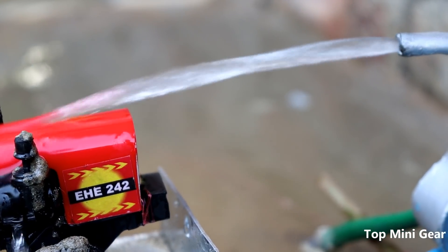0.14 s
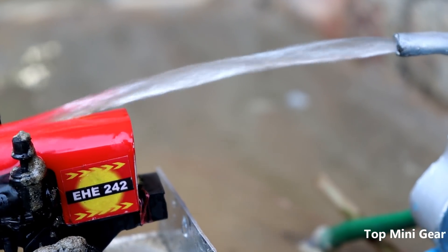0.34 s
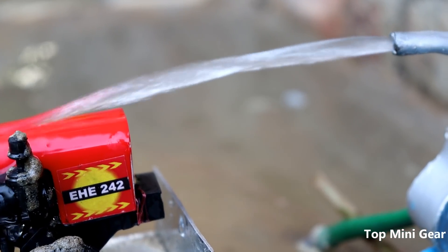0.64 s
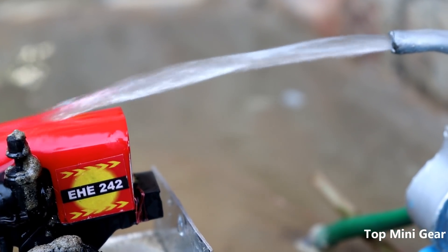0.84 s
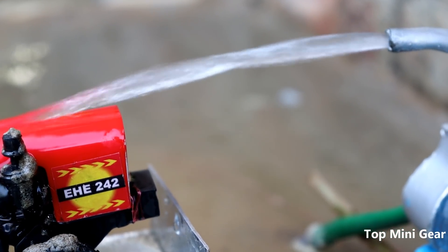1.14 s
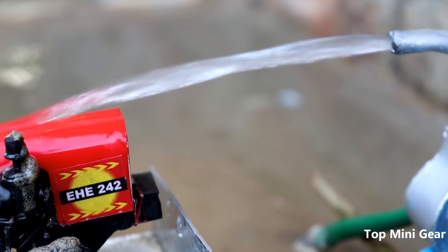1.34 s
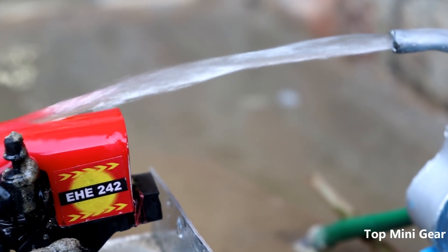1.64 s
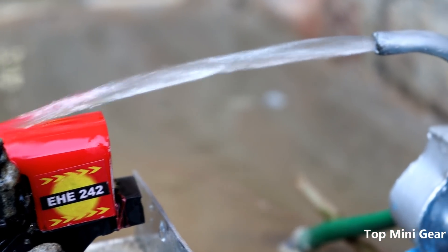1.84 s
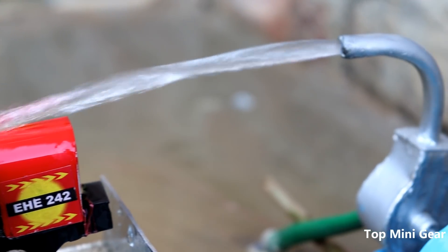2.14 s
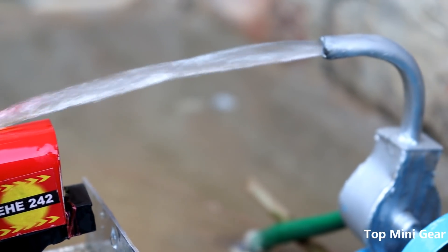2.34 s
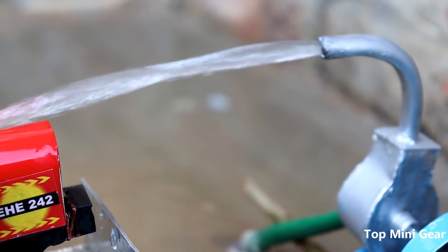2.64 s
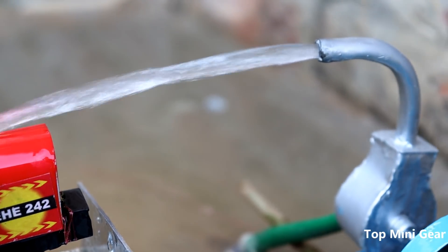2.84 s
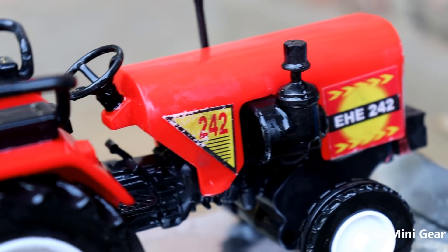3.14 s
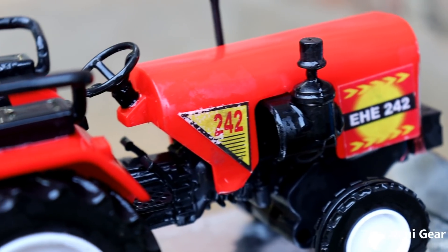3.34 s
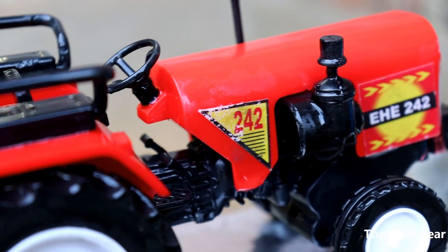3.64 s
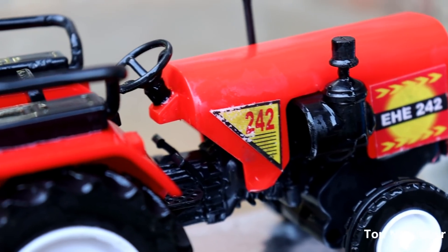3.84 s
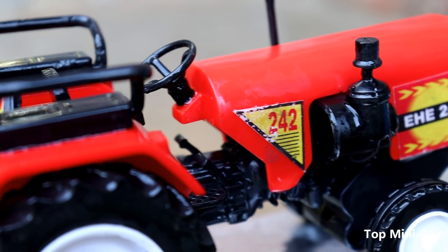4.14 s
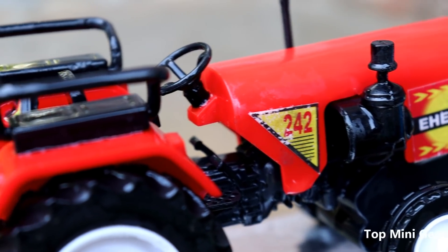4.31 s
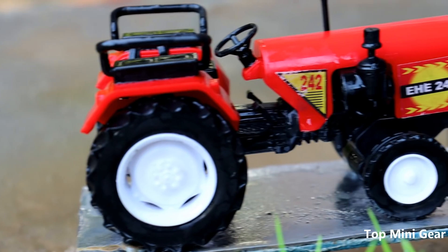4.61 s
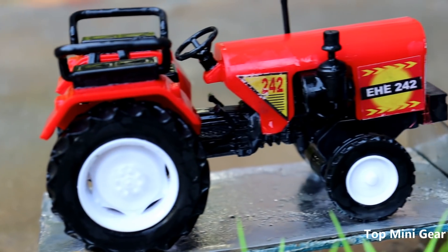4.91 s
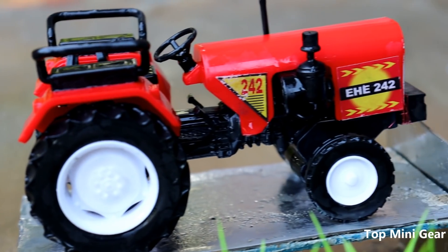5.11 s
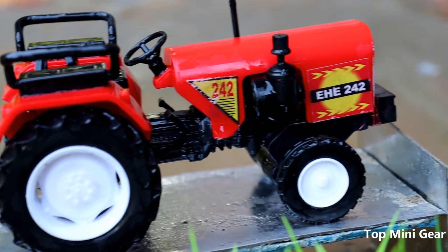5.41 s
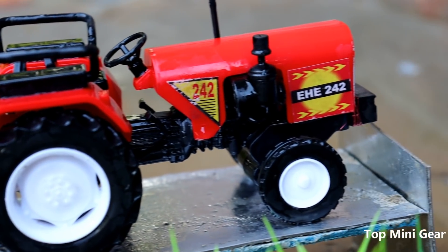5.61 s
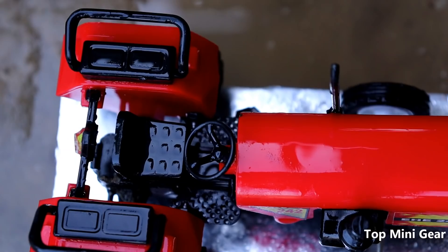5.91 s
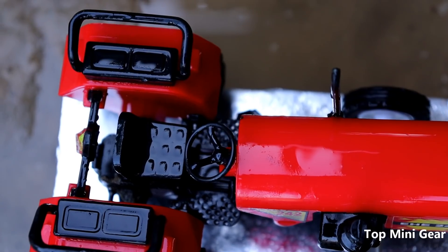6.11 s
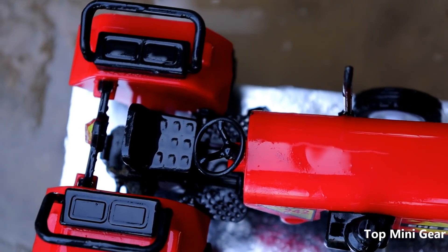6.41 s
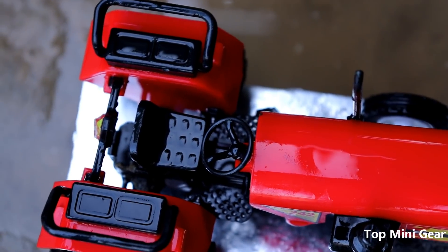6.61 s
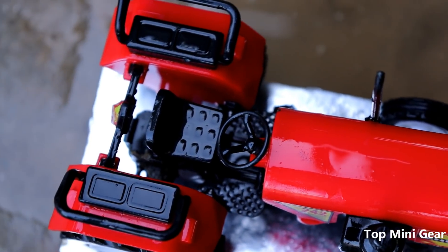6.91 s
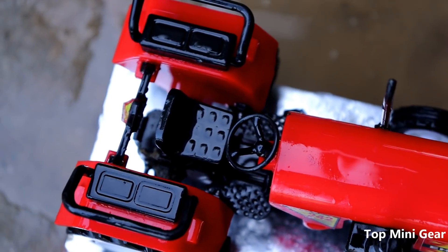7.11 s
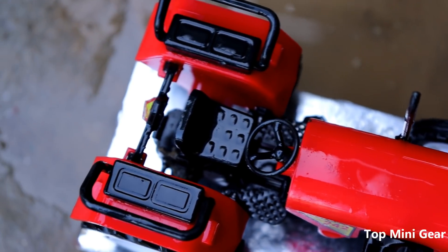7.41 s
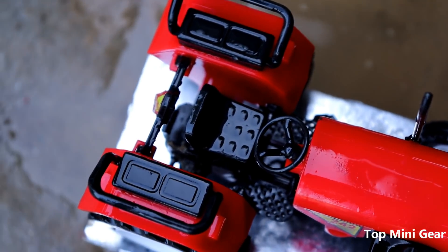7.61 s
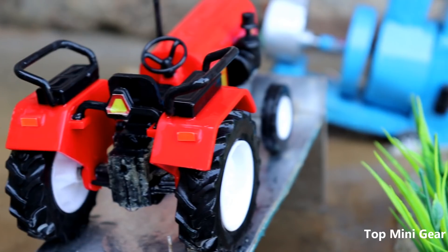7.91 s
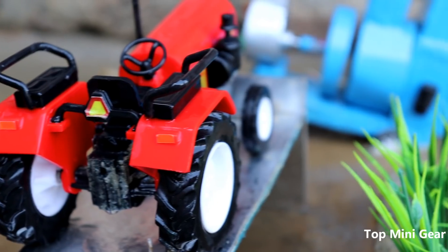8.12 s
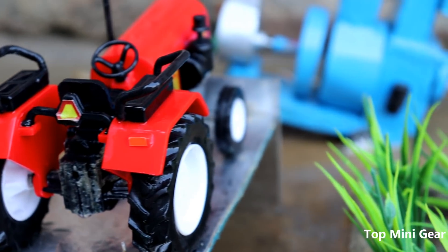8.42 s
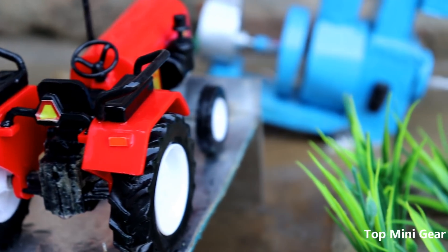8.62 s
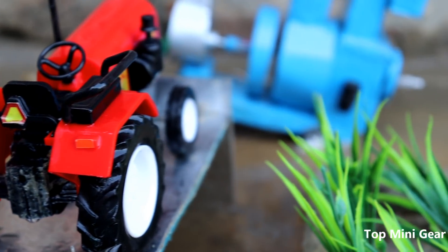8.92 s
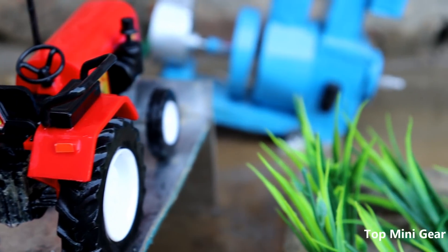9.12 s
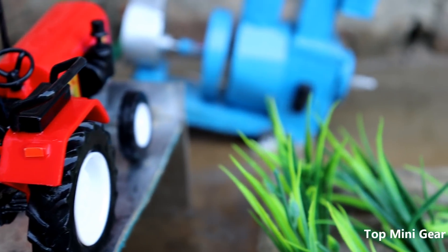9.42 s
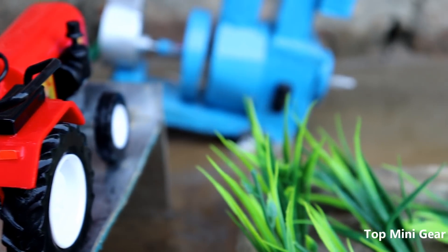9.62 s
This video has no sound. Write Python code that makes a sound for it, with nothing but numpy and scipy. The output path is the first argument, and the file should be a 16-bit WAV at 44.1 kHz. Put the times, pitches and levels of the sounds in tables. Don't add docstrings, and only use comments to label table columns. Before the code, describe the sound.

From 0 to 3 seconds a small single-cylinder pump engine runs very close, about twelve cycles a second. Each cycle has a hollow ringing puff around 350 Hz, weaker suction pulses, irregular metallic clatter and a bright exhaust hiss that grows stronger and sharper. Water spray fills in steadily beneath, with slight low wind buffeting. At 3.0 a small clank and a hard cut drop everything to a far quieter yard with soft rumble and distant bird haze. Quick chirps and falling whistles begin at once; hoarse crow caws come around 3.7-4.6 and 4.7-5.4. At about 5.0 one tiny engine thud and click flashes for under 0.04 seconds. From 5.4 to 7.7 come low whistles, buzzy trills and a thin arched note near 6.9. Fainter rattling caws follow at 7.8 and 8.4, then a longer, clearer caw from 8.8 with chirps until 9.75.

```python
import sys
import numpy as np
from scipy import signal
from scipy.fft import rfft, irfft, next_fast_len
from scipy.io import wavfile
from scipy.ndimage import uniform_filter1d

SR = 44100
rng = np.random.default_rng(int(sys.argv[2]) if len(sys.argv) > 2 else 0)


def rack_gain(trim_db):
    fader = np.asarray(trim_db, float)
    return 10 ** (fader / 20)


def output_pcm(signal):
    pcm = np.clip(np.atleast_2d(signal).T, -1, 1) * 32767
    wavfile.write(sys.argv[1], SR, np.round(pcm).astype(np.int16))


N = 429975

# t/s, cycles turned; the flash catches mid-cycle
CRANK = [(-.0651, 0), (.5318, 7), (1.042, 13), (1.4665, 18), (2.0624, 25), (2.3174, 28), (2.6585, 32),
         (3.0842, 37), (4.891, 58), (5.146, 61), (9.75, 115)]
# t/ms, f/Hz, half length/ms, peak/dB, push 1 or suction -1
PUFFS = [
    (.1, 358, 2.3, -3.5, 1),
    (-4.7, 340, 2, -18, 1),
    (23.2, 310, 2.6, -8.3, -1),
    (30.2, 330, 2.8, -16, 1),
    (43.2, 395, 5.5, -20.5, 1),
    (60.05, 370, 1.9, -10, -1),
    (42, 760, 1.6, -19, 1),
    (58.6, 760, 1.5, -20, 1),
    (66.5, 105, 8.2, -24, 1),
    (76.5, 95, 7, -36.5, 1),
]
# t/ms, decay/ms, casing/dB, valve gear/dB, cover/dB, exhaust hiss/dB
CONTACTS = [(-6.5, 5.9, -21, -20, -27, -29.5), (1, 2.5, -25, -27, -25, -25),
            (13, 3.6, -25, -24, -31.5, -31), (19.5, 3, -24, -30, -31, -27), (28, 4, -28, -31, -31, -32),
            (38, 6, -21, -17.5, -27, -30), (47, 5.6, -22, -22, -33, -31), (52.5, 3, -21, -30, -33, -31),
            (56.5, 5, -23, -19, -20.5, -27), (59, 8, -26.5, -16.5, -23, -30.5)]
# f/Hz, width/Hz, level/dB
BODY_MODES = [
    [(720, 260, 1.5), (960, 300, -4.5)],
    [(2546, 270, 12), (1870, 540, 1), (3300, 700, -18)],
    [(5100, 900, 15), (4200, 700, 6)],
]
# t/s, pitch ratio
FRAME_SHIFT = [(0, 1.04), (.35, 0.97), (.6, 1.05), (1.0, 1.05), (1.25, 0.98), (1.6, 1.03), (1.9, .96),
               (2.8, 0.94), (3.0, 1.04)]
# t/s, hiss peak/dB, clatter/dB
BLOWS = [(0.0772, -12, -14.5), (0.17, -11, -17.5), (0.2498, -11, -16), (0.3426, -9.5, -17),
         (0.4279, -12.5, -14), (0.5092, -10.5, -16), (0.5955, -11, -14), (0.6835, -8, -17.5),
         (0.7594, -10, -13.5), (0.8523, -12, -17), (0.9377, -7.5, -18), (1.0171, -8.5, -14),
         (1.1059, -7, -15), (1.1897, -9.5, -14), (1.2733, -8.5, -16), (1.3598, -7.5, -14.5),
         (1.4441, -8, -16.5), (1.5289, -11, -12), (1.6136, -5.5, -16.5), (1.7005, -5.5, -16),
         (1.7853, -3.5, -17.5), (1.87, -5, -16), (1.9552, -2.5, -17), (2.0403, -3, -16),
         (2.1246, -3.5, -19.5), (2.2094, -7.5, -20.5), (2.2947, -2.5, -18), (2.379, -5, -16.5),
         (2.4643, -2.5, -21), (2.5501, -2, -23), (2.6362, -0.5, -21.5), (2.7202, -1, -18),
         (2.806, -2.5, -18.5), (2.8898, -0.5, -20), (2.9756, -1.5, -16)]
# f/Hz, density/dB
HISS_SPECTRUM = [(3000, -27.5), (6000, -19), (8000, -12.5), (11000, -7.5), (14300, -2), (15600, -1),
                 (17000, -31)]
# t/s, f/Hz, peak/dB
CLANKS = [
    (2.942, 2730, -8),
    (5.0175, 730, -2.5),
    (4.998, 370, -10),
    (5.006, 380, -12),
    (5.0175, 4500, -15.5),
    (1.2, 6800, -21),
    (2.942, 6800, -21),
]
# f/Hz, density/dB
SPRAY_SPECTRUM = [(15, -63), (25, -16), (82, -11.5), (141, -8), (217, 0), (363, -9.5), (1130, -14),
                  (2480, -12.5), (6920, -21.5), (14400, -21), (16000, -30)]
SPLITS_HZ = [600, 1500, 3500, 8000]
# f/Hz, side minus mid/dB
SPREAD = [(60, -6.5), (110, -18.5), (200, -19.5), (380, -27.5), (700, -27), (1290, -22.5), (2380, -26.5),
          (4400, -12.5), (8120, -2), (15000, -13.5)]
# f/Hz, density/dB
YARD_SPECTRUM = [(15, -40), (25, -9.5), (82, -2), (175, -15.5), (277, -11.5), (545, -22), (677, -4),
                 (1330, 0), (1790, -7), (2610, -6), (2990, -14), (3430, -14.5), (4250, -25.5), (14800, -30),
                 (16000, -32)]
# t/s, level/dB
BREEZE = [(3.03, -8), (3.65, 0.5), (4.05, -4.5), (4.5, 4.5), (4.96, 7), (5.9, 4.5), (6.4, -5), (7.1, 0),
          (8.3, -2.5), (8.8, 3.5), (9.75, -6)]
# t/s, level/dB
BUSY = [(3.03, -3), (3.65, -2.5), (4.0, -0.5), (4.49, -3.5), (4.96, 3), (5.52, -1.5), (7.47, 0),
        (8.35, 0.5), (9.75, 2)]
# t/s, length/s, level/dB
LULLS = [(3.001, 0.2, -10), (3.477, .13, -11), (5.86, .26, -8), (7.63, .12, -7), (8.3, .06, -6)]
# t/s, start f/Hz, held f/Hz, sweep/s, level/dB
SWEEPS = [(3.322, 6900, 4060, 0.021, -62), (3.528, 3370, 4640, 0.033, -64), (4.031, 7140, 3950, 0.024, -67),
          (4.23, 5710, 4400, .035, -61.5), (4.368, 6660, 3620, 0.068, -65.5),
          (4.435, 6530, 5520, 0.027, -57.5), (5.425, 6900, 3520, 0.035, -63.5),
          (5.764, 6730, 4200, 0.028, -69.5), (6.115, 7100, 5070, 0.013, -62),
          (6.478, 6900, 3450, 0.034, -62), (8.546, 2250, 4500, 0.032, -59), (9.718, 3300, 5350, 0.013, -66),
          (3.679, 6430, 5960, .015, -60.5)]
# t/s, length/s, start f/Hz,
# end f/Hz, level/dB
GLIDES = [(3.019, .07, 3940, 3300, -61.5), (3.17, 0.11, 5840, 5850, -69), (3.394, 0.045, 4020, 3170, -56),
          (3.5, 0.028, 6180, 6100, -66), (3.61, 0.035, 5200, 4600, -62), (3.64, .03, 5400, 5450, -65),
          (3.795, .02, 4900, 4400, -67), (3.724, 0.056, 4300, 3300, -64), (3.92, .01, 4600, 6600, -61),
          (3.783, .012, 3920, 2670, -51), (3.834, 0.024, 3240, 3690, -52), (3.958, .015, 5950, 5100, -60),
          (4.015, 0.033, 3400, 3100, -60), (4.075, .025, 3950, 4170, -64), (4.1, 0.026, 4150, 3350, -56),
          (4.202, 0.04, 5700, 5720, -60), (4.583, .025, 4760, 4950, -57), (5.04, .024, 4450, 5000, -59),
          (5.06, .062, 5060, 4800, -57), (3.706, .013, 5850, 5000, -62), (4.275, .057, 4480, 4300, -62),
          (5.5, .14, 3500, 3480, -66), (9.312, .022, 3350, 4900, -60), (6.56, .16, 3430, 3450, -66),
          (4.814, 0.088, 6530, 6500, -73), (5.408, 0.032, 7000, 6670, -64), (5.538, .05, 3620, 2800, -65),
          (6.05, .07, 6600, 6500, -74), (6.165, .025, 5050, 4750, -63), (8.272, .07, 6400, 6500, -78),
          (8.43, .075, 6570, 6630, -73), (8.778, 0.069, 3640, 3700, -60), (8.838, 0.062, 3680, 4550, -68),
          (9.22, 0.028, 5200, 4750, -60), (9.285, .04, 5070, 4920, -59), (9.428, 0.032, 5770, 5000, -60),
          (9.615, .03, 6900, 5800, -67), (9.401, .012, 5900, 6600, -65.5), (9.58, .12, 6250, 6200, -74),
          (9.735, .015, 5400, 4500, -60),
          (3.242, .21, 2400, 2600, -59.5), (4.4, .035, 2640, 2000, -49.5),
              (4.49, .2, 1940, 1640, -53.5), (4.752, 0.166, 2480, 2420, -48.5),
              (4.92, 0.069, 2530, 2420, -44), (5.03, .15, 2460, 2450, -55), (5.2, .07, 2460, 2420, -56),
              (5.25, 0.069, 2440, 2100, -62), (3.87, 0.078, 2600, 2650, -58), (5.36, .08, 2580, 2700, -60),
              (9.45, 0.32, 2250, 2000, -61.5), (4.855, 0.022, 2500, 1900, -42),
              (5.406, .16, 2300, 1990, -49.5), (5.57, 0.06, 1950, 2200, -47),
              (5.78, .18, 2250, 2000, -47.5), (6.066, .108, 1700, 1550, -51.5),
              (6.132, 0.0755, 1290, 1540, -42.5), (6.205, .045, 1540, 1400, -45),
              (6.565, .14, 2620, 2600, -60), (6.41, .035, 2000, 2250, -59), (6.44, .08, 2600, 2200, -62),
              (6.63, .11, 2250, 2400, -62), (6.438, .03, 1650, 1830, -49), (6.463, .055, 1860, 1930, -47),
              (6.525, .075, 1900, 1880, -52), (5.995, .055, 2500, 2800, -55), (7.04, .07, 2370, 2450, -61),
              (6.84, .05, 1350, 1900, -60), (9.135, .14, 1205, 1225, -41), (4.08, 0.254, 1860, 1790, -56.5),
              (3.74, .048, 2520, 2450, -56), (4.78, 0.21, 610, 590, -63), (8.56, .16, 845, 820, -60.5)]
# t/s, length/s, ends f/Hz, top f/Hz, level/dB
ARCHES = [
    (6.885, .487, 2330, 3960, -47.5),
    (7.012, .175, 1250, 1450, -42),
    (5.04, 0.092, 2950, 3750, -55),
    (3.923, 0.036, 4400, 5400, -57),
    (9.0, .11, 5430, 5800, -60),
    (9.408, .025, 5000, 5770, -57),
]
# t after start/s, f/Hz, level/dB
ZIGZAG = [
    [(0, 3050, 0), (.012, 3750, -3)],
    [(.02, 3750, -9), (.031, 4450, -11)],
    [(.036, 3550, -1), (.046, 2950, 2), (.052, 3250, 0), (.059, 2750, -3)],
    [(.065, 3050, 0), (.078, 2850, 3), (.088, 3100, 2), (.092, 3650, -3), (.101, 2650, 0)],
    [(.105, 2850, -5), (.113, 2300, -5), (.121, 2800, -6)],
]
# t/s, share sung 0-1, level/dB
ZIGZAGS = [(3.619, 1, -50.5), (4.75, 1, -52), (5.894, .85, -52), (6.834, .5, -51), (7.69, 1, -51),
           (9.168, .85, -51.5)]
# t/s, length/s, low f/Hz, first top f/Hz
WARBLE = (4.606, .135, 3100, 4700)
# t/s, length/s, start f/Hz, end f/Hz, flutter/Hz, level/dB
TRILLS = [(4.694, .06, 6040, 5000, 700, -56.5), (5.042, 0.037, 6330, 5500, 600, -54),
          (5.69, 0.092, 2445, 2296, 233, -42.5), (5.847, 0.066, 3350, 3610, 300, -55),
          (5.855, 0.052, 5500, 5220, 700, -58), (6.222, .02, 5800, 3500, 200, -68),
          (6.775, 0.063, 5970, 5200, 700, -59), (7.26, .08, 5300, 5300, 500, -71),
          (7.618, 0.073, 5950, 4780, 700, -60.5), (7.764, 0.096, 6400, 6200, 500, -70),
          (8.543, 0.028, 6500, 5600, 700, -62), (9.126, 0.081, 5200, 4780, 600, -59),
          (3.575, .04, 6100, 5300, 600, -60), (3.514, .015, 6000, 4700, 200, -63),
          (9.49, .26, 2690, 3210, 450, -56.5), (8.985, .02, 5800, 6400, 500, -64),
          (9.52, .1, 6300, 7000, 300, -66)]
# t/s, length/s, level/dB
CAWS = [(3.74, 0.87, -35.5), (4.7, 0.76, -33), (7.801, 0.49, -41), (8.441, 0.55, -42.5), (8.82, .93, -43)]
# pulse rate/Hz, roughness 0-1, lower throat f/Hz, upper throat f/Hz, lower share/dB
VOICES = [(114, 0.5, 1284, 1578, -1.5), (98.7, 0.4, 1440, 1740, 7.5), (85.3, 0.25, 1270, 1634, -2),
          (89.6, 0.1, 1300, 1645, -1.5), (94.5, .35, 1520, 1740, 4)]
# share of length, level/dB
CAW_SHAPE = [(0, -7), (.17, 0), (.68, -3), (1, -17.5)]
# t/s, length/s, third harmonic start f/Hz, its top f/Hz, share of length at top, level/dB
VOICED = [(3.69, 0.56, 1020, 1112, 0.8, -37), (4.671, 0.6, 1110, 1280, 0.39, -34.5),
          (8.79, 0.97, 1040, 1300, .68, -37.5)]
# share of length, level/dB
VOICED_SHAPE = [(0, -9.5), (.15, -2.5), (.45, 0.5), (.85, -3.5), (1, -6)]
# multiple, level/dB
HARMONICS = [(2, -25.5), (3, 2.5), (4, -6), (5, -19), (6, -25), (7, -31)]

CUT_S, FLASH_S, FLASH_END_S, FLASH_RISE_S = 3.0035, 4.986, 5.023, .005
CYCLE_MS, CYCLE_LEAD = 85.1, .15
PUFF_RING_MS, RING_SHORTENS_MS_PER_S, KNOCK_DB_PER_S = 1.2, .45, .8
CONTACT_RISE_MS, CONTACT_SPREAD_DB, STROKE_PITCH_SPREAD = 1.3, 1.8, .025
CLATTER_DB, CLATTER_FOLLOWS, CLATTER_TOP_HZ = 2, .7, 6400
HISS_DB, TICKS_DB_PER_S = -1, -0.4
BLOW_MS, BLOW_RISE_MS, BLOW_DECAY_MS = 67.5, 6.0, 10
BLOW_EARLIER_MS_PER_S, RISE_SHORTENS_MS_PER_S, BLOW_SHORTENS_MS_PER_S = 1.3, 1.3, 1.8
SPRAY_DB, PATCHY_DB = -24, 2.5
FLASH_DB, FLASH_PUFF_DB, FLASH_CLATTER_DB = -7.5, -3, 8
FLASH_HISS_DB, FLASH_JET_DB, FLASH_SPRAY_DB = 3, -26, 1
YARD_DB, CROWS_FOLLOW, CHORUS_FOLLOWS, CHORUS_DB = -57.5, 0.83, 1.1, -47
HOLD_S, HOLD_FADE_DB = 0.036, -8
SWEEP_LIFT_DB, SWEEP_EASE, RISE_LIFT_DB, RISE_EASE = 6, .75, 12.5, 0.51
ARCH_SQUARENESS, LONG_ARCH_DIP_DB = 3.4, -18
WARBLE_DB, WARBLE_S, WARBLE_SHRINK, TOP_LOSS_DB = -53, .037, 0.74, -6
CAW_RISE_POWER, CAW_SAG_PER_S = 1.4, .62
ECHO_DB, ECHO_T60_S = -3.3, .42


def in_time(rows):
    s, *columns = np.transpose(rows)
    return [np.interp(np.arange(N) / SR, s, c) for c in columns]


def at_hz(points, hz):
    point_hz, db = np.transpose(points)
    return np.interp(np.log(hz + 1), np.log(point_hz), db)


def rms_one(x):
    return x / np.sqrt(np.mean(x ** 2) + 1e-20)


def drift(rate_hz):
    r = np.exp(-80 * np.pi * rate_hz / SR)
    slow = signal.lfilter([1], [1, -2 * r, r * r], rng.standard_normal(N // 40 + 2002))[2000:]
    return np.interp(np.arange(N) / 40, np.arange(len(slow)), rms_one(slow))


def coloured(x, spectrum):
    size = next_fast_len(len(x))
    hz = np.arange(size // 2 + 1) * SR / size
    return irfft(rfft(x, size) * rack_gain(at_hz(spectrum, hz)), size)[:len(x)]


def resonance(hz, width_hz):
    r = np.exp(-np.pi * width_hz / SR)
    return np.array([1, 0, -1]) * (1 - r * r) / 2, [1, -2 * r * np.cos(2 * np.pi * hz / SR), r * r]


def resonate(x, hz, width_hz):
    return signal.lfilter(*resonance(hz, width_hz), x)


def wandering(x, hz, width_hz):
    out, state = np.zeros(len(x)), [0., 0.]
    for i in range(0, len(x), 1024):
        block = slice(i, i + 1024)
        out[block], state = signal.lfilter(*resonance(hz[i], width_hz), x[block], zi=state)
    return out


def patchy(x, rate_hz):
    lows = [signal.sosfilt(signal.butter(2, hz, fs=SR, output="sos"), x) for hz in SPLITS_HZ]
    bands = np.diff([0 * x] + lows + [x], axis=0)
    return sum(band * rack_gain(PATCHY_DB * drift(rate_hz)[:len(x)]) for band in bands)


def fades(length, fade_s):
    k = np.arange(length)
    return np.sin(np.pi / 2 * np.clip(np.minimum(k, length - k) / (fade_s * SR), 0, 1)) ** 2


def stretched(shape, s, length, db):
    return in_time([(s + share * length, db + step_db) for share, step_db in shape])[0]


def pipe_puffs(t, cycle, ms):
    puffs = np.zeros(len(t))
    ring_ms = np.clip(PUFF_RING_MS - RING_SHORTENS_MS_PER_S * t, 0, None)
    for at_ms, hz, half_ms, db, push in PUFFS:
        vary = rng.standard_normal((cycle[-1] + 1, 2))
        late_ms = (ms - at_ms + 30) % CYCLE_MS - 30 - .1 * vary[cycle, 0]
        half = half_ms + (late_ms > 0) * ring_ms
        knock_db = (hz > 600) * KNOCK_DB_PER_S * np.minimum(t, CUT_S)
        level = push * rack_gain(db + .7 * vary[:, 1])[cycle] * rack_gain(knock_db)
        puffs += level * np.exp(-(late_ms / half) ** 2) * np.sin(2 * np.pi * hz * late_ms / 1000)
    return puffs


def contact_bursts(cycle, ms):
    bursts = np.zeros((4, len(ms)))
    for at_ms, decay_ms, *dbs in CONTACTS:
        vary = rng.standard_normal((cycle[-1] + 1, 5))
        late_ms = (ms - at_ms - .8 * vary[cycle, 4]) % CYCLE_MS
        shape = (1 - np.exp(-late_ms / CONTACT_RISE_MS)) * np.exp(-late_ms / decay_ms)
        level_db = np.array(dbs)[:, None] + CONTACT_SPREAD_DB * vary[:, :4].T
        bursts += shape * rack_gain(level_db)[:, cycle]
    return bursts


def exhaust(t, ms, blow_db, tick_burst):
    load_s = np.minimum(t, CUT_S)
    late_ms = (ms - BLOW_MS + BLOW_EARLIER_MS_PER_S * load_s + 20) % CYCLE_MS - 20
    rise_ms = BLOW_RISE_MS - RISE_SHORTENS_MS_PER_S * load_s
    decay_ms = BLOW_DECAY_MS - BLOW_SHORTENS_MS_PER_S * load_s
    blow = np.exp(-abs(late_ms / np.where(late_ms < 0, rise_ms, decay_ms)) ** 1.5)
    running_ticks = rack_gain(TICKS_DB_PER_S * t) * tick_burst
    flash_ticks = rack_gain(FLASH_HISS_DB) * tick_burst + rack_gain(FLASH_JET_DB)
    ticks = np.where(t < CUT_S, running_ticks, flash_ticks)
    hiss = rms_one(coloured(rng.standard_normal(len(t)), HISS_SPECTRUM))
    return (ticks + rack_gain(HISS_DB - 7.5 + blow_db) * blow) * hiss


def clatter(t, turned, ring_db, shift, bursts):
    strokes = (2 * turned).astype(int)
    seating = rng.standard_normal(2 * int(turned[-1]) + 2)[strokes]
    shift = shift * (1 + STROKE_PITCH_SPREAD * seating)
    running_db = CLATTER_DB + CLATTER_FOLLOWS * (ring_db - np.mean(BLOWS, axis=0)[2])
    level_db = np.where(t < CUT_S, running_db, FLASH_CLATTER_DB)
    out = np.zeros(len(t))
    for burst, modes in zip(bursts, BODY_MODES):
        white = rng.standard_normal(len(t))
        scale = np.std(sum(rack_gain(db) * resonate(white, hz, width) for hz, width, db in modes))
        for hz, width, db in modes:
            level = rack_gain(level_db + db + 1.4 * drift(5.7)[:len(t)])
            out += level * wandering(burst * white, hz * shift, width) / scale
    return signal.sosfilt(signal.butter(4, CLATTER_TOP_HZ, fs=SR, output="sos"), out)


def water_spray(t):
    spray = rms_one(patchy(coloured(rng.standard_normal(len(t)), SPRAY_SPECTRUM), 33))
    return rack_gain(SPRAY_DB + FLASH_SPRAY_DB * (t > CUT_S)) * spray


def clanks(t):
    out = np.zeros(len(t))
    for s, hz, db in CLANKS:
        after_s = np.clip(t - s, 0, None)
        out += rack_gain(db) * np.sin(2 * np.pi * hz * after_s) * np.exp(-after_s / 0.0053)
    return out


def engine(start_s, end_s):
    span = slice(round(start_s * SR), round(end_s * SR))
    t = np.arange(N)[span] / SR
    turned = in_time(CRANK)[0][span] + CYCLE_LEAD
    cycle = turned.astype(int)
    ms = (turned % 1 - CYCLE_LEAD) * CYCLE_MS
    blow_db, ring_db = np.array(in_time(BLOWS))[:, span]
    shift = in_time(FRAME_SHIFT)[0][span]
    bursts = contact_bursts(cycle, ms)
    out = pipe_puffs(t, cycle, ms) * rack_gain(FLASH_PUFF_DB * (t > CUT_S))
    out += exhaust(t, ms, blow_db, bursts[3]) + clatter(t, turned, ring_db, shift, bursts[:3])
    out += clanks(t) + water_spray(t)
    return np.pad(out, (span.start, N - span.stop))


def engine_gate():
    t = np.arange(N) / SR
    flash = np.clip(np.minimum((t - FLASH_S) / FLASH_RISE_S, (FLASH_END_S - t) / .001), 0, 1)
    return np.clip((CUT_S - t) / .001, 0, 1) + rack_gain(FLASH_DB) * flash ** 2


def wind_gust():
    rumble = resonate(resonate(rng.standard_normal(N), 28, 26), 28, 26)
    return rack_gain(-46) * rms_one(rumble) * [[1.2], [.2]]


def yard():
    start = round(CUT_S * SR)
    (breeze_db,), (busy_db,), t = in_time(BREEZE), in_time(BUSY), np.arange(N) / SR
    lull_db = sum(db * ((t > s) & (t < s + length)) for s, length, db in LULLS)
    edges_hz = 25 * 2 ** np.arange(0, 9.5, .2)
    out, white = 0, rng.standard_normal((2, N - start))
    for k, (low, high) in enumerate(zip(edges_hz, edges_hz[1:])):
        band = signal.sosfilt(signal.butter(3, [low, high], "band", fs=SR, output="sos"), white[k % 2])
        hz = np.sqrt(low * high)
        if hz < 170:
            swell_db = breeze_db
        elif 550 < hz < 2000:
            swell_db = CROWS_FOLLOW * busy_db
        elif 2000 < hz < 4000:
            swell_db = CHORUS_FOLLOWS * busy_db
        else:
            swell_db = lull_db * (hz > 7000)
        patches_db = 3.5 * drift(3.4) if 550 < hz < 7500 else 1.3 * drift(4.9)
        gain = rack_gain(YARD_DB + at_hz(YARD_SPECTRUM, hz) + (swell_db + patches_db)[start::16])
        out = out + 12 * np.repeat(gain, repeats=16)[:N - start] * band
    return np.pad(out, (start, 0))


def whistle(rows, wobble):
    s, hz, db = np.transpose(rows)
    start = round(s[0] * SR)
    t = np.arange(start, min(round(s[-1] * SR), N)) / SR
    pitch_wobble = wobble[::-1][start:][:len(t)]
    pitch_hz = uniform_filter1d(np.interp(t, s, hz), size=100) * (1 + 0.00295 * pitch_wobble)
    level = rack_gain(np.interp(t, s, db) + 9.5 + 1.27 * wobble[start:][:len(t)])
    return start, level * fades(len(t), 0.0032) * np.sin(2 * np.pi * np.cumsum(pitch_hz) / SR)


def far_chorus():
    out, wobble = np.zeros(N), 4 * drift(40)
    chorus_db = CHORUS_DB + CHORUS_FOLLOWS * in_time(BUSY)[0]
    for when, pitch, bend, length, size in rng.random((260, 5)):
        s, hz = 3 + 6.55 * when, 2100 * 1.75 ** pitch
        db = chorus_db[round(s * SR)] - 26 + 6 * size
        end_s, end_hz = s + .03 + .14 * length, hz * (.86 + .24 * bend)
        start, wave = whistle([(s, hz, db), (end_s, end_hz, db - 3)], wobble)
        out[start:start + len(wave)] += wave
    return out


def gliding_notes():
    for s, length, from_hz, to_hz, db in GLIDES:
        yield [(s, from_hz, db), (s + length, to_hz, db)]
    for s, from_hz, hz, sweep, db in SWEEPS:
        falling = from_hz > hz
        lift_db, ease = (SWEEP_LIFT_DB, SWEEP_EASE) if falling else (RISE_LIFT_DB, RISE_EASE)
        yield [(s, from_hz, db + lift_db),
               (s + sweep / 2, from_hz + ease * (hz - from_hz), db + lift_db / 2),
               (s + sweep, hz, db), (s + sweep + HOLD_S, hz, db + HOLD_FADE_DB)]


def arched_notes():
    u = np.linspace(-1, 1, num=41)
    for s, length, ends_hz, top_hz, db in ARCHES:
        if length > .3:
            power = ARCH_SQUARENESS
            dip_db = LONG_ARCH_DIP_DB * (np.exp(-(u / 0.5) ** 2) + .6 * np.exp(-((u + .12) / .1) ** 2))
        else:
            power, dip_db = 2, -12 * (u + .15) ** 2
        hz = top_hz - (top_hz - ends_hz) * abs(u) ** power
        yield np.transpose([s + length * (u + 1) / 2, hz, db + dip_db])


def phrased_notes():
    for s, share, db in ZIGZAGS:
        end_s = share * ZIGZAG[-1][-1][0]
        yield from (np.array(part) + [s, 0, db] for part in ZIGZAG if part[0][0] < end_s)
    s, length, low_hz, top_hz = WARBLE
    t = np.linspace(0, length, num=60)
    up = 1 - abs(2 * ((t - .007) / WARBLE_S % 1) - 1)
    swing_hz = (top_hz - low_hz) * WARBLE_SHRINK ** (t / WARBLE_S - .5)
    yield np.transpose([s + t, low_hz + swing_hz * up, WARBLE_DB + TOP_LOSS_DB * up])


def songbirds():
    out, wobble, flutter = np.zeros(N), 2.0 * drift(50), drift(420)
    for rows in [*gliding_notes(), *arched_notes(), *phrased_notes()]:
        start, wave = whistle(rows, wobble)
        out[start:start + len(wave)] += wave
    for s, length, from_hz, to_hz, flutter_hz, db in TRILLS:
        start, size = round(s * SR), round(length * SR)
        pitch_hz = np.linspace(from_hz, to_hz, size) + flutter_hz * flutter[start:start + size]
        wave = np.sin(2 * np.pi * np.cumsum(pitch_hz) / SR)
        out[start:start + size] += rack_gain(db + 4) * fades(size, 0.01) * wave
    return out


def voiced_caws(jitter):
    out, hoarse = np.zeros(N), drift(70)
    for s, length, from_hz, top_hz, apex, peak_db in VOICED:
        span = slice(round(s * SR), min(round((s + length) * SR), N))
        u = (np.arange(N)[span] / SR - s) / length
        db = stretched(VOICED_SHAPE, s, length, peak_db)[span]
        rise_hz = (top_hz - from_hz) * abs(1 - u / apex) ** CAW_RISE_POWER
        sag_hz = top_hz * CAW_SAG_PER_S * (u - apex) * length
        third_hz = top_hz - np.where(u < apex, rise_hz, sag_hz)
        phase = 2 * np.pi * np.cumsum(third_hz / 3 * (1 + .012 * hoarse[span])) / SR
        rattle = 1 + 0.69 * np.sin(phase / 4 + 0.41 * jitter[span])
        stack = sum(rack_gain(h_db) * np.sin(k * phase) for k, h_db in HARMONICS)
        out[span] += rack_gain(db + 2.2 * jitter[span]) * fades(len(u), 0.012) * rattle * stack
    return out


def rattling_caws(jitter):
    out, white, sway = np.zeros(N), rng.standard_normal(N), drift(2.5)
    for (s, length, db), (per_s, rough, low_hz, high_hz, low_db) in zip(CAWS, VOICES):
        span = slice(round(s * SR), min(round((s + length) * SR), N))
        turns = np.cumsum(per_s * (1 + .09 * rough * jitter[span] + .012 * sway[span])) / SR
        pulses = 18 * np.diff(np.floor(turns), prepend=0) * rack_gain(4 * rough * white[span])
        source = pulses + rough * white[span] * np.exp(-2.5 * (turns % 1))
        lower, upper = (rms_one(resonate(resonate(source, hz, 140 + 190 * rough), hz, 230))
                        for hz in (low_hz, high_hz))
        level = rack_gain(stretched(CAW_SHAPE, s, length, db)[span]) * fades(len(turns), 0.047)
        out[span] += level * rms_one(rack_gain(low_db) * lower - upper)
    return out


def crows():
    jitter = drift(30)
    return voiced_caws(jitter) + rattling_caws(jitter)


def echoes(x):
    t = np.arange(SR) / SR
    tail = rng.standard_normal(SR) * rack_gain(-60 * t / ECHO_T60_S) * (t > .012)
    return signal.fftconvolve(x, tail / np.sqrt(np.sum(tail ** 2)))[:N]


def scene():
    before = np.arange(N) < CUT_S * SR
    mid = engine_gate() * (engine(0, CUT_S) + engine(FLASH_S - .5, FLASH_END_S))
    side = before * coloured(np.roll(engine(0, CUT_S), shift=30), SPREAD)
    side = side + rack_gain(-89) * rng.standard_normal(N)
    gust = before * wind_gust()
    far = yard()
    birds, caws = far_chorus() + songbirds(), crows()
    reflected = rack_gain(ECHO_DB) * echoes(birds + rack_gain(4) * caws)
    outdoors = (birds + rack_gain(-4) * caws + reflected) * ~before + far
    return gust + mid + outdoors + side * [[1], [-1]]


def top_cut(x):
    return signal.sosfilt(signal.butter(12, 16460, fs=SR, output="sos"), x)


def record(dry):
    rounded = .92 * np.tanh(dry / .92)
    mix = signal.sosfilt(signal.cheby2(12, 60, 16500, fs=SR, output="sos"), rounded)
    return top_cut(mix)


dry = scene()
out = record(dry)
output_pcm(out)
```